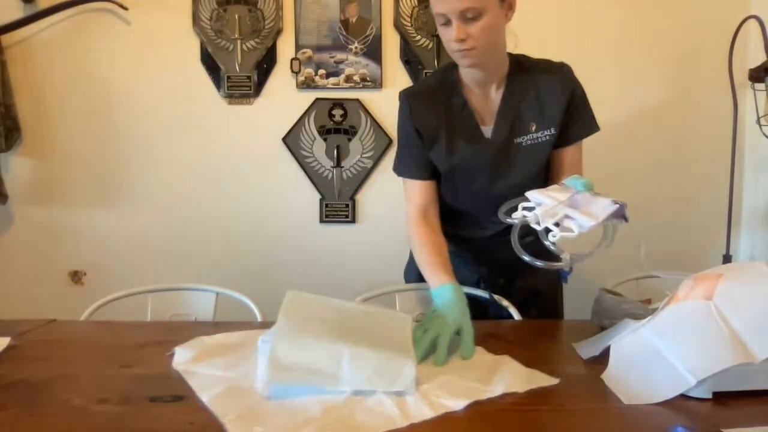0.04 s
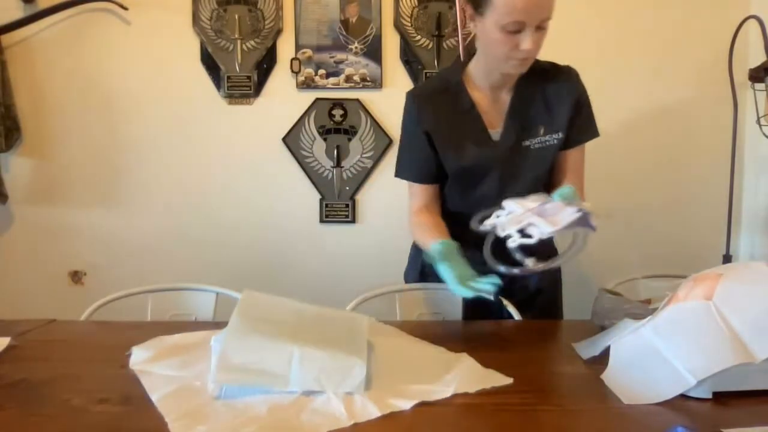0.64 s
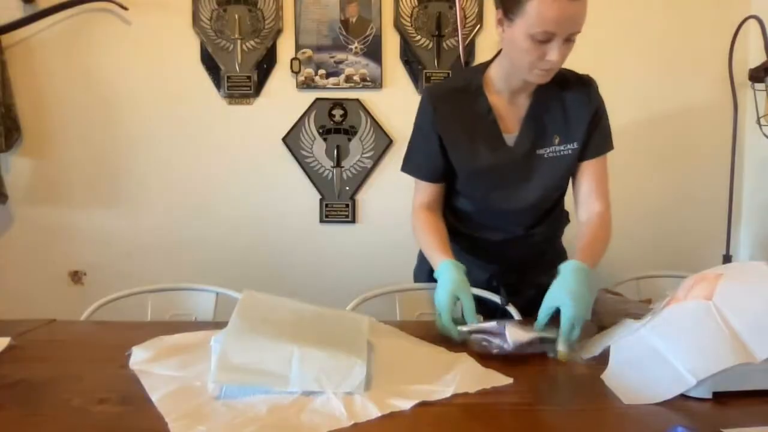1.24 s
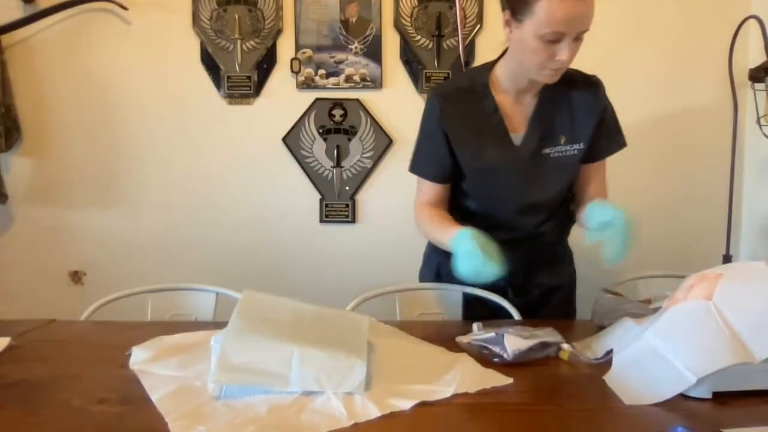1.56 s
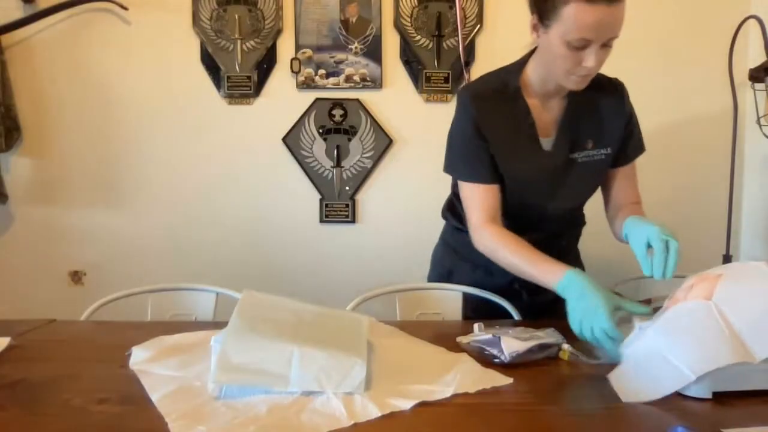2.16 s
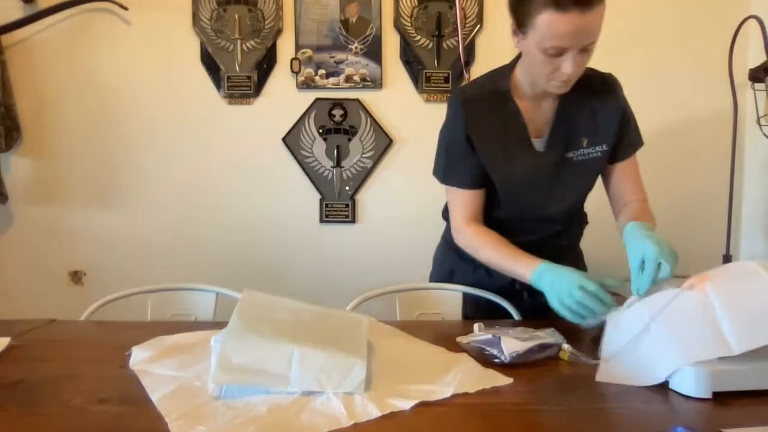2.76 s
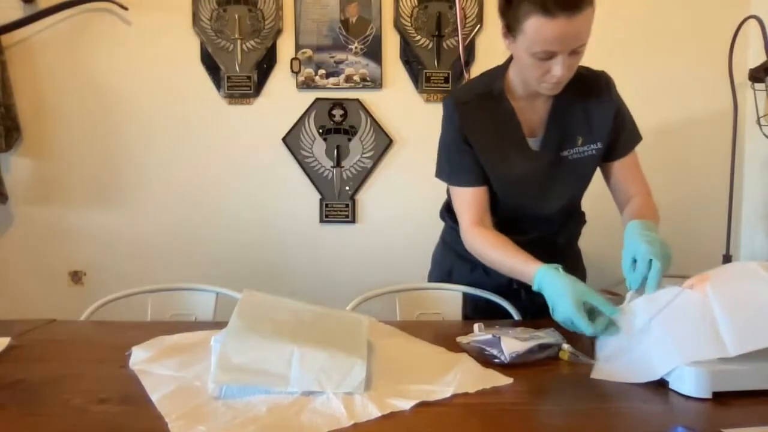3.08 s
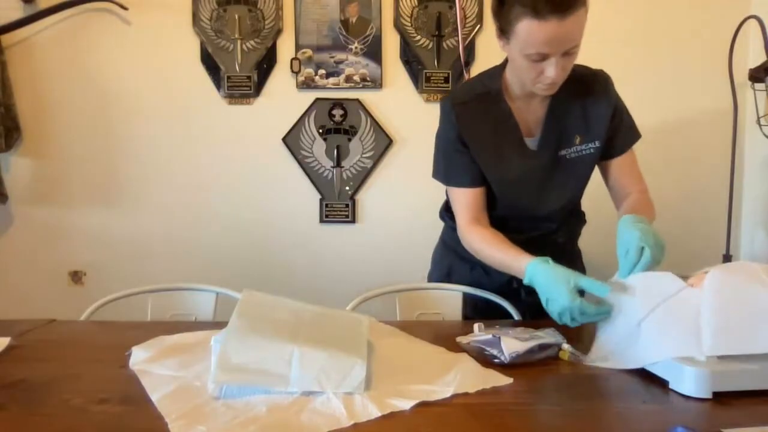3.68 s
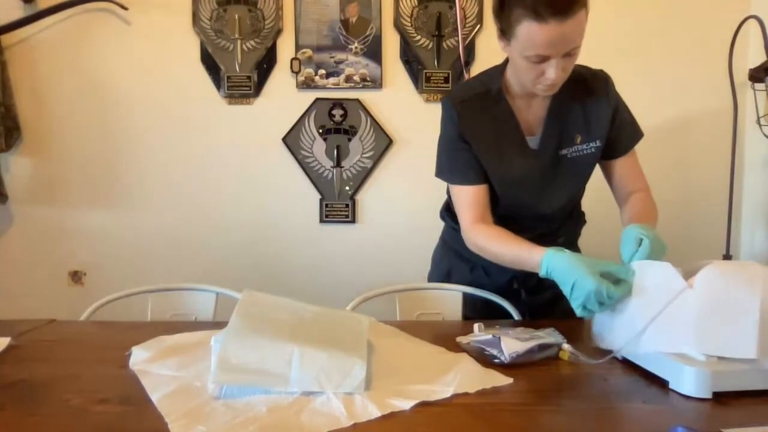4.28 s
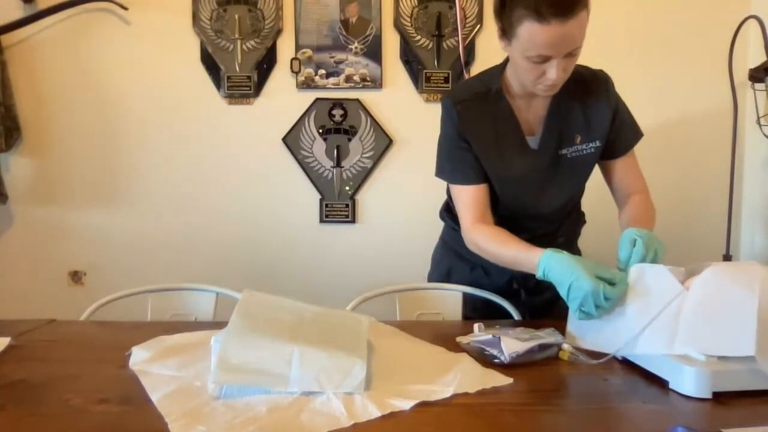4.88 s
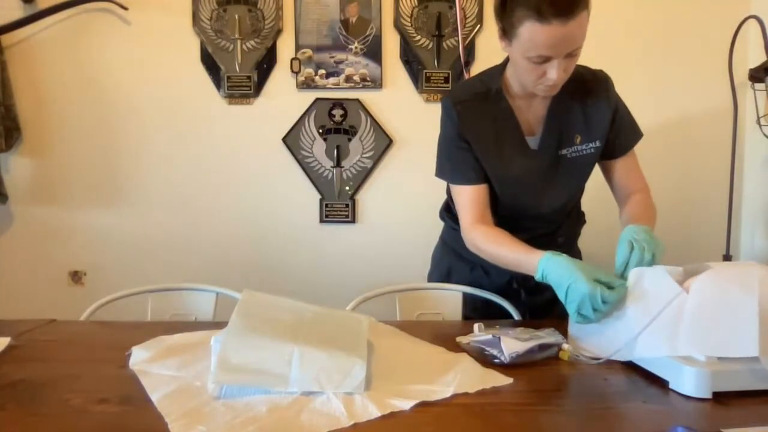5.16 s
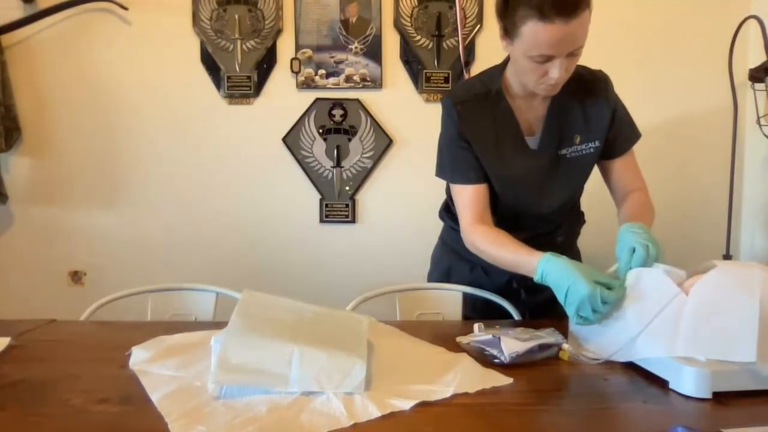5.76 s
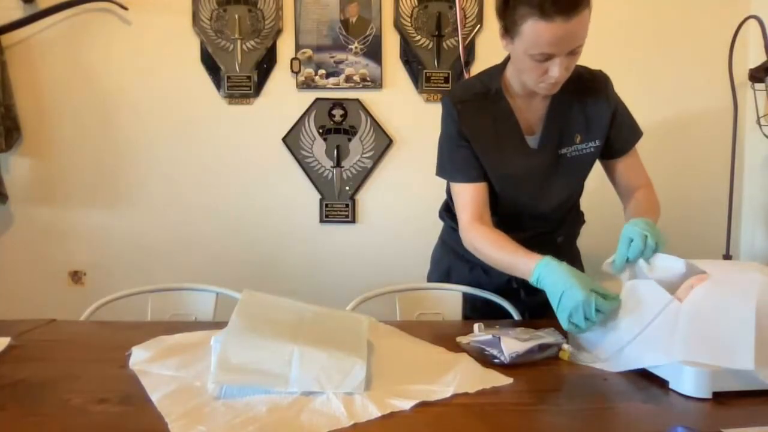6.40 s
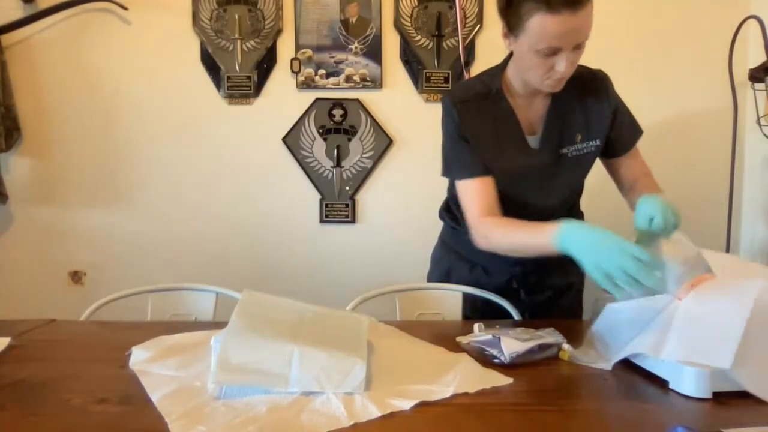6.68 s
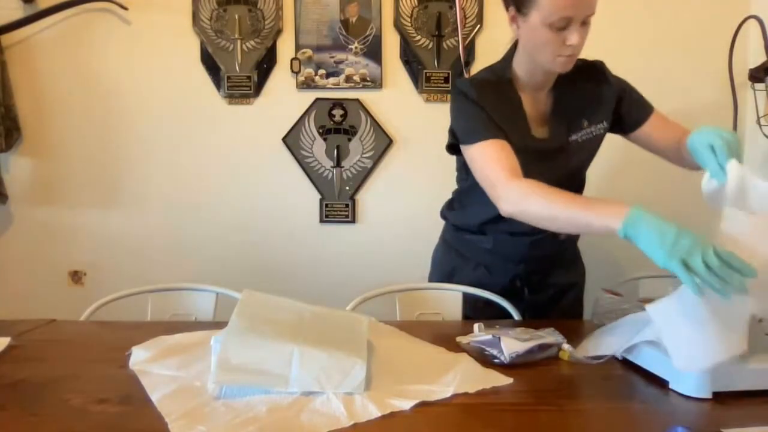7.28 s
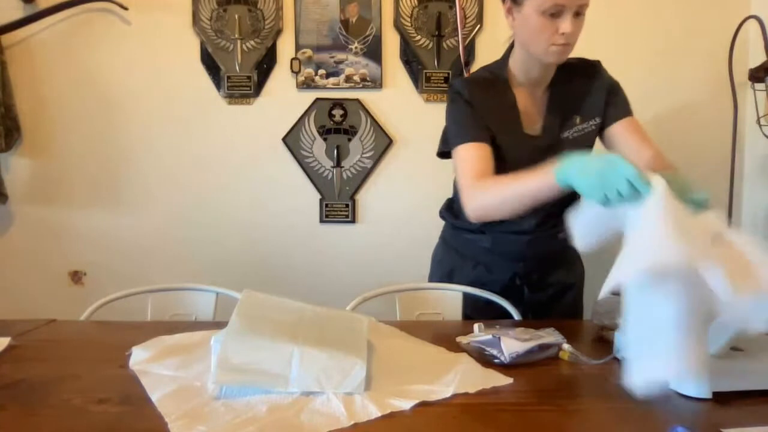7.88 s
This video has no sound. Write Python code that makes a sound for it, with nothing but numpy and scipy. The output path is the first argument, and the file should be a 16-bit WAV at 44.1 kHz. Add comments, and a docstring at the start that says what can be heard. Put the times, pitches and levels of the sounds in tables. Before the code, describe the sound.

Paper slides softly over a wooden table as a dog in another room gives one faint woof. A bagged plastic kit with tubing then clatters down, the loudest moment. After a short pause, a paper drape is tucked and pinched in uneven crinkles and small pops. The dog gives a second, gruffer woof, and the sheet flaps and rustles as it is pulled off. The room is small and very quiet.

```python
"""Wrapping paper slides softly over a wooden table, then a bagged plastic kit with tubing clatters down,
its impacts ringing the modes of kit and table top. A paper drape is tucked, pinched and pulled off a
training model: each stroke buckles tiny creases, and the sheet flaps as it lifts.
A dog in another room gives two short woofs, one at the very start and one late in the rustling.
The room is small and very quiet; a noise suppressor and a steep low-pass act on the whole sound."""
import sys
import numpy as np
from scipy import signal
from scipy.fft import rfft, irfft
from scipy.io import wavfile
from scipy.ndimage import uniform_filter1d

SR = 44100
rng = np.random.default_rng(int(sys.argv[2]) if len(sys.argv) > 2 else 0)


def persist_wave(psi):
    """Save psi, clipped to +-1, as 16-bit WAV."""
    counts = np.round(np.clip(psi, -1, 1) * 32767).astype(np.int16)
    wavfile.write(sys.argv[1], SR, np.atleast_2d(counts).T)


N = 354519
TIME = np.arange(N) / SR


def from_db(db):
    """Amplitude ratio of a level in decibels."""
    return 10 ** (np.asarray(db) / 20)


def unit_rms(x):
    """Normalisation to unit mean power."""
    return x / np.sqrt(np.mean(x ** 2) + 1e-20)


def butter(x, hz, kind, order=2):
    """Causal Butterworth low-, high- or band-pass."""
    sections = signal.butter(order, np.clip(hz, 10, .45 * SR), kind, fs=SR, output="sos")
    return signal.sosfilt(sections, x + 1e-18)


def drift(cutoff_hz):
    """Slow random fluctuation: low-passed Gaussian noise of unit rms."""
    knots = rng.standard_normal(int(N / SR * 200))
    slow = signal.sosfiltfilt(signal.butter(2, cutoff_hz, fs=200, output="sos"), knots, padtype="even")
    return np.interp(TIME, np.linspace(0, N / SR, len(slow)), unit_rms(slow))


def colour(x, spectrum):
    """Minimum-phase filtering with unit energy, built by folding the cepstrum of the given spectrum."""
    hz, db = np.transpose(spectrum)
    size = 4096
    grid_hz = np.maximum(np.fft.rfftfreq(size, 1 / SR), 1)
    magnitude = from_db(np.interp(np.log(grid_hz), np.log(hz), db))
    cepstrum = irfft(np.log(magnitude))
    cepstrum[1:size // 2] *= 2
    cepstrum[size // 2 + 1:] = 0
    response = irfft(np.exp(rfft(cepstrum)))
    return signal.fftconvolve(x, response / np.linalg.norm(response))[:len(x)]


def swell(peak_s, length_s, rise_share, roundness):
    """Envelope of a move: 1 at its peak, -40 dB at both ends; roundness 1 is pointed, 2 a bell."""
    away = np.where(TIME < peak_s, (peak_s - TIME) / rise_share, (TIME - peak_s) / (1 - rise_share))
    away /= length_s
    gain, near = np.zeros(N), away < 2
    gain[near] = from_db(-40 * away[near] ** roundness)
    return gain


def move_envelopes(moves, rise_share, roundness):
    """Incoherent summation: overlapping moves add in power, giving one envelope per level column."""
    power = 0
    for peak_s, length_s, db, *offsets_db in moves:
        gains = from_db(db + np.array([0, *offsets_db]))
        power = power + np.outer(gains, swell(peak_s, length_s, rise_share, roundness)) ** 2
    return np.sqrt(power)


def noise_decay(t60_s):
    """Dense reflections or contacts merge into exponentially decaying noise of unit energy."""
    t = TIME[:SR // 2]
    tail = rng.standard_normal(len(t)) * from_db(-60 * t / t60_s)
    return tail / np.linalg.norm(tail)


def room(x, wet_db):
    """Reverberation: diffuse reflections follow the direct sound, and the treble is absorbed first."""
    tail = butter(noise_decay(.22), 2700, "low") + butter(noise_decay(.15), 2200, "high")
    delayed_tail = np.concatenate([np.zeros(int(.004 * SR)), tail])
    return x + from_db(wet_db) * signal.fftconvolve(x, delayed_tail)[:N]


def crinkle(spectrum, per_s, spread_db, flicker_db, wet_db):
    """Buckling as a Poisson process: creases click, and the facets they ring change as the sheet bends."""
    at = np.flatnonzero(rng.random(N) < per_s / SR)
    sizes = from_db(spread_db * np.minimum(rng.exponential(1, N), 5)[at])
    edges_hz = np.geomspace(900, 8700, 35) - 830
    strengths, facets = rng.standard_normal(N), np.zeros(N)
    for k, (low, high) in enumerate(zip(edges_hz, edges_hz[1:])):
        clicks = np.zeros(N)
        clicks[at] = sizes * strengths[at - k]   # a crease strikes each facet with another strength
        flicker = from_db(flicker_db * 2 * np.tanh(drift(8) / 2))
        facets += butter(clicks, [low, high], "band") * flicker
    return room(colour(facets, spectrum), wet_db)


# Background noise of the room: (frequency [Hz], relative spectral density [dB])
AIR_SPECTRUM = [(60, -19), (130, -4), (280, -8.5), (390, 0), (520, -6.5), (1500, -15.5), (5000, -15.5),
                (7300, -27.5)]
def room_air():
    """The ambient noise floor is faint, stationary coloured noise."""
    return from_db(-84) * unit_rms(colour(rng.standard_normal(N), AIR_SPECTRUM))


# Contours of the two calls: (time [s], pitch [Hz], relative level [dB])
SOFT_CALL = [(0, 369, -53), (.02, 364, -40), (.043, 377, -48.5), (.057, 407, -41), (.071, 407.4, -28),
             (.087, 415.4, -32), (.098, 398, -47.5), (.11, 372, -32.5), (.124, 403.4, -44.5),
             (.16, 386, -49.5), (.18, 383, -58.5), (.23, 377, -72)]
GRUFF_CALL = [(6.595, 330.5, -73), (6.62, 355.5, -49.5), (6.645, 395, -42.5), (6.655, 419.4, -40),
              (6.675, 459.5, -33.5), (6.72, 462.7, -38.5), (6.738, 477, -45), (6.75, 464, -39.5),
              (6.775, 424, -65)]
# Vocal tract response for each call: (frequency [Hz], relative gain [dB])
SOFT_TRACT = [(200, -8), (390, 1), (620, -14), (830, -18), (1000, -27), (1240, -24), (1700, -37),
              (2400, -54)]
GRUFF_TRACT = [(200, -52), (270, -14), (340, 6.5), (460, 1.5), (620, 5), (750, 0), (950, -6.5),
               (1120, -2.5), (1380, 1), (1650, -11.5), (1850, -5), (2150, -17.5), (2400, -9), (2850, -22.5),
               (3150, -34.5), (4000, -45)]
def woof(call, tract, jitter, rasp, brightening, wet_db):
    """Source and filter: unsteady, raspy vocal pulses, purer when soft, are shaped by the throat."""
    times, hz, db = np.transpose(call)
    outside_s = np.abs(TIME - np.clip(TIME, times[0], times[-1]))
    level_db = np.interp(TIME, times, db) - 250 * np.minimum(outside_s, 1)   # fades beyond both ends
    effort = uniform_filter1d(from_db(level_db), size=int(.007 * SR))   # effort cannot jump
    pitch_hz = np.interp(TIME, times, hz) * (1 + jitter * drift(86.2))
    phase = 2 * np.pi * np.cumsum(pitch_hz) / SR
    overtones = sum(np.cos(k * phase) for k in range(2, 9))
    pulses = (np.cos(phase) + overtones * (effort / effort.max()) ** brightening) / 2
    breath = rasp * unit_rms(butter(rng.standard_normal(N), 2200, "low") * (1 + np.cos(phase)))
    full_voice_rms = np.std(colour((np.cos(phase) + overtones) / 2 + breath, tract))
    return room(colour(pulses + breath, tract) / full_voice_rms * effort, wet_db)


# Sliding wrapping paper: (frequency [Hz], relative spectral density [dB])
WRAP_SPECTRUM = [(530, -92.5), (900, -36), (924, -31), (1090, -16), (1230, -17.5), (1400, -9), (1970, -10),
                 (3270, -1.5), (6320, -10.5), (7340, -19), (9540, -57), (16100, -120)]
# Its moves: (peak time [s], duration [s], crinkle level [dB], hiss re crinkle [dB])
WRAP_SLIDES = [(.048, 0.21, -62.5, -2.5), (.40, 0.48, -58.5, 7), (.93, 0.26, -99, 17.5),
               (1.115, 0.099, -89, 9), (1.18, 0.16, -71.5, -17.5)]
def wrapping_paper():
    """Sliding friction: a corner of paper crosses the table, its dense clicks merging into hiss."""
    grains = crinkle(WRAP_SPECTRUM, per_s=12000, spread_db=3, flicker_db=1.5, wet_db=-10.5)
    bending, sliding = move_envelopes(WRAP_SLIDES, rise_share=.57, roundness=1.84)
    crackle = unit_rms(butter(grains, 2610, "low", order=4))
    hiss = unit_rms(butter(grains, 3300, "high", order=4))
    return crackle * bending + hiss * sliding


# Drags of gloves or plastic: (peak time [s], relative level [dB], resonance [Hz], 1/e half-length [s])
DRAGS = [(0.687, -67, 390, 0.015), (0.807, -68.5, 394, .025), (0.934, -62.5, 4600, 0.013),
         (1.394, -46.5, 405, 0.023), (2.719, -48, 1113, .012), (3.282, -47, 4020, 0.013),
         (3.468, -52, 3300, 0.049), (4.03, -61.5, 2445, 0.05), (4.149, -56.5, 2960, 0.063),
         (4.484, -40, 1537, 0.027), (5.619, -48, 1710, 0.015), (5.713, -58, 1500, 0.016),
         (5.756, -59, 5700, 0.013), (5.9, -60, 4460, 0.028), (5.98, -45, 1330, 0.011),
         (6.053, -53, 6460, 0.014), (6.416, -55, 1350, 0.016)]
def rubs():
    """Friction excites one narrow resonance of the paper or table for the length of a short drag."""
    noise, out = rng.standard_normal(N), np.zeros(N)
    for peak_s, db, hz, half_s in DRAGS:
        resonance = unit_rms(butter(noise, [hz * .905, hz * 1.095], "band"))
        out += from_db(db - 7.5) * np.exp(-((TIME - peak_s) / half_s) ** 2) * resonance
    return out


# Crinkling plastic bag: (frequency [Hz], relative spectral density [dB])
BAG_SPECTRUM = [(300, 4), (1000, -0.5), (2200, -6), (3300, -2.5), (5000, -9), (7300, -24.5)]
# Its squeezes: (peak time [s], duration [s], relative level [dB])
BAG_SQUEEZES = [(1.208, 0.26, -49.5), (1.322, 0.32, -50.5), (1.44, 0.24, -50.5), (1.482, 0.18, -42),
                (1.55, .08, -49)]
def plastic_bag():
    """Thin film buckles as the fingers squeeze the bag and it settles."""
    squeezing = move_envelopes(BAG_SQUEEZES, rise_share=.27, roundness=1)[0]
    grains = unit_rms(crinkle(BAG_SPECTRUM, per_s=2900, spread_db=3, flicker_db=2.5, wet_db=-5.5))
    return from_db(5.5) * butter(squeezing * grains, 300, "high")


def ring(modes, t):
    """Free vibration: a blow starts each mode as a damped sine of varying strength and sign."""
    out = np.zeros(len(t))
    for hz, db, t60_s in modes:
        strength = from_db(db + rng.normal(0, 2.5)) * rng.choice([-1, 1])
        decay = from_db(-60 * t / min(t60_s, .15))   # the soft bag damps the parts and the table
        out += strength * decay * np.sin(2 * np.pi * hz * t)
    return out


# Modes of kit and table top: (frequency [Hz], relative level [dB], T60 before the bag's damping [s])
PLASTIC_MODES = [(397.4, -21.5, .19), (606, -14.5, 0.46), (721, -9, .2), (908, -8.5, .2), (990, -12, 0.22),
                 (1113, -5.5, 0.17), (1144, -15.5, 0.36), (1322, -9.5, 0.1), (1523, -8, 0.1),
                 (1590, -14, 0.03), (1737, -17.5, 0.38), (2480, -21.5, 0.16), (2710, -21, .13)]
WOOD_MODES = [(107, -19, 0.36), (174, -36.5, 0.087), (237, -22, .1), (259, -15, 0.099)]
# Kit and tubing meeting the table:
# (time [s], relative level [dB], band centre [Hz], band spread re centre [ratio], thud offset [dB])
CONTACTS = [(1.2019, -17.5, 1640, 0.16, -20), (1.21, -16, 1700, 0.078, -32), (1.212, -32.5, 380, 0.68, -9),
            (1.224, -22, 910, 0.26, -26), (1.244, -26, 770, 0.17, -41), (1.273, -30, 820, 0.2, -9),
            (1.327, -31, 880, 0.23, -5), (1.332, -24, 363, 0.48, 1.5), (1.347, -31, 350, 0.45, -5),
            (1.462, -18, 2667, 0.93, 0.5), (1.4625, -19.5, 476, 0.34, -9), (1.4691, -12.5, 1730, 0.51, -5),
            (1.4705, -12, 1370, 0.12, -18), (1.473, -22.5, 297, 0.58, -0.5),
            (1.4785, -23.5, 1100, 0.98, -8.5), (1.488, -18, 1120, 0.12, -12), (1.513, -25, 600, 1, -2),
            (1.522, -24.5, 1100, 1.7, 2), (1.5399, -23, 1700, 0.43, 1), (1.552, -17, 1710, 0.2, -23),
            (1.553, -19.5, 560, 0.26, -11.5), (1.5712, -24, 800, 0.4, -14.5)]
def kit_clatter():
    """Impact excitation: each contact snaps, rattles the plastic parts and rings kit and table top."""
    blows, ringing, t = np.zeros(N), np.zeros(N), TIME[:SR // 2]
    for start_s, db, hz, spread, thud_db in CONTACTS:
        span = slice(int(start_s * SR), int(start_s * SR) + len(t))
        band = [hz / (1 + spread), hz * (1 + spread)]   # hard parts click high, the soft bag thuds low
        rattle = butter(noise_decay(.054), band, "band", order=1)
        snap = butter(noise_decay(.0032), [hz / 2, hz * 3.2], "band", order=1)
        plastic = butter(ring(PLASTIC_MODES, t), band, "band", order=1)
        wood = ring(WOOD_MODES, t)
        blows[span] += from_db(db) * rattle + from_db(db - 12) * snap
        ringing[span] += from_db(db - 10) * plastic + from_db(db + thud_db - 6.5) * wood
    return kit_radiation(blows) + ringing


# Response of the kit to a blow: (frequency [Hz], relative gain [dB])
CRACK_SPECTRUM = [(40, -52), (60, -29), (110, -7), (170, -6), (260, 3), (370, 1), (740, -1), (1150, -5.5),
                  (1700, -5.5), (2300, -9), (3500, -16), (5000, -20.5), (7300, -34)]
def kit_radiation(blows):
    """Frequency response: the kit colours the blows as it radiates them into the room."""
    return room(from_db(18) * colour(blows, CRACK_SPECTRUM), wet_db=-5.5)


# The sheet pushing air or bumping the table: (peak time [s], level [dB], frequency [Hz], duration [s])
BILLOWS = [(0.065, -52.5, 108, 0.24), (2.49, -67, 150, 0.44), (2.68, -71.5, 157, 0.16),
           (2.85, -60.5, 202, 0.22), (2.868, -57.5, 115, 0.13), (3.79, -75, 140.5, 0.32),
           (4.06, -73, 132, 0.097), (4.78, -79, 113.3, 0.38), (6.74, -63.5, 127.7, 0.35),
           (7.024, -30.5, 98, 0.039), (7.029, -39.5, 140, 0.11), (7.2, -80, 136.6, 0.19),
           (7.52, -56, 174, 0.28), (7.545, -59.5, 82.5, 0.18), (7.68, -71, 154, 0.29),
           (7.83, -71.5, 189, 0.7), (8.0, -70, 193, 0.22)]
def flaps():
    """Air displacement: the billowing sheet radiates a few slow, uneven swings of pressure."""
    out, flutter_rad = np.zeros(N), .7 * drift(35)
    for peak_s, db, hz, length_s in BILLOWS:
        envelope = from_db(db) * swell(peak_s, length_s, rise_share=.35, roundness=1.05)
        out += envelope * np.sin(2 * np.pi * hz * (TIME - peak_s) + flutter_rad)
    return room(out, wet_db=-16.5)


# Single large creases: (time [s], relative level [dB], frequency [Hz], 1/e decay time [cycles])
LARGE_CREASES = [(2.3918, -33, 2600, .7), (2.398, -34, 1720, 1.1), (2.6843, -42, 1560, 1.6),
                 (2.8283, -37, 2080, .8), (2.9854, -36, 2300, .9), (3.1967, -46, 2000, 3),
                 (3.288, -36, 3700, .9), (3.3221, -37, 2400, 1), (3.4219, -33, 2450, 1.1),
                 (3.586, -43, 2230, 1), (3.7028, -39, 1900, .7), (3.7277, -37, 2750, .6),
                 (4.0585, -47, 2450, .8), (4.204, -42, 3020, 5), (4.4365, -44, 2300, 1),
                 (4.4788, -31, 2100, .9), (4.4859, -28, 1700, 1.2), (4.6819, -41, 1900, 2),
                 (4.8906, -43, 2800, 1.8), (5.31, -35, 3700, .7), (5.3324, -31, 2170, .8),
                 (5.378, -33.5, 1700, 1.8), (5.4386, -43, 2880, .9), (5.613, -34, 1650, 1.8),
                 (5.98, -26, 1440, 1.2), (6.3686, -36, 2200, 1.5), (6.4623, -25.5, 1900, .6),
                 (6.8765, -37, 3800, .6), (7.4233, -35, 2600, 1), (7.5006, -32, 2700, .5),
                 (7.5123, -34, 1930, .7), (7.5359, -31, 1540, .6), (7.671, -32, 2740, .7),
                 (7.864, -40, 2150, 2), (7.8878, -32, 2200, .9), (7.9958, -32, 2750, .7),
                 (8.0038, -33, 2500, .7)]
def crease_pops(flurry_per_s=2200):
    """Snap-through buckling: a large crease pops amid a flurry of small ones, each ringing briefly."""
    out, t = np.zeros(N), TIME[:SR // 50]
    flurry = rng.standard_normal(N) * (rng.random(N) < flurry_per_s / SR)
    for pop_s, db, hz, cycles in LARGE_CREASES:
        clicks = from_db(-20) * flurry * swell(pop_s, length_s=.065, rise_share=.3, roundness=.94)
        clicks[int(pop_s * SR)] += 1
        snap = np.sin(2 * np.pi * hz * t) * np.exp(-t * hz / cycles)
        snap = butter(snap, 900, "high", order=5)   # too small to radiate bass
        snap = butter(snap, hz * 2.6, "low")   # soft paper radiates little far above its pitch
        out += from_db(db - 3.8) * signal.oaconvolve(clicks, snap / np.abs(snap).max())[:N]
    return room(out, wet_db=-13)


# Rustling drape: (frequency [Hz], relative spectral density [dB])
DRAPE_SPECTRUM = [(60, -44.5), (110, 1), (220, -18.5), (400, -13), (720, -11.5), (1100, -5.5), (1500, 0),
                  (2000, -1), (3000, -6.5), (4500, 0.5), (6700, -1.5), (7300, -12.5)]
# A light touch sounds a few facets, a firm stroke all: (crinkle level [dB], flicker depth [dB])
FLICKER_BY_LEVEL = [(-65, 4.6), (-47, 2.4)]
# Strokes of the hands:
# (peak time [s], duration [s], relative crinkle level [dB], hiss offset [dB], flexing offset [dB])
HAND_STROKES = [(2.35, 1, -68, -24, -16), (2.41, 0.18, -50, -23, -23.5), (2.483, 0.39, -45, -9.5, -28),
                (2.69, 0.55, -60, -15, -23), (2.828, 0.35, -54, -5, -14.5), (2.988, 0.2, -59.5, -7, -17.5),
                (3.204, 0.94, -70.5, -14, -17), (3.283, 0.32, -57.5, -2, -31),
                (3.34, 0.22, -55.5, -9.5, -44), (3.465, 0.34, -56.5, -7.5, -25),
                (3.585, 0.27, -62.5, -10, -28), (3.725, 0.19, -55, -3.5, -13),
                (3.782, 0.49, -64.5, -1.5, -21), (4.112, 0.5, -73, -3.5, -27), (4.415, 0.41, -69, -9, -21),
                (4.494, 0.23, -47, -2, -17), (4.741, 0.3, -57, -2.5, -27), (4.912, 0.28, -71, 7.5, -25.5),
                (5.071, 0.18, -73, -1.5, -43), (5.252, 0.23, -80, 6, -24), (5.331, 0.16, -50.5, 0.5, -34),
                (5.455, 0.14, -59.5, 0, -23.5), (5.569, 0.21, -50, -1.5, -29), (5.759, 0.17, -76, 5, -12.5),
                (5.895, 0.27, -66, -8.5, -18.5), (5.965, 0.14, -58, -13, -34),
                (6.057, 0.31, -85.5, 15.5, 1), (6.24, 0.32, -58, 1, -30.5), (6.388, 0.14, -46.5, -7.5, -28),
                (6.462, 0.17, -49.5, -3, -29.5), (6.86, 0.29, -60, -2.5, -24),
                (7.009, 0.16, -63.5, -1, -7.5), (7.071, 0.19, -58, -12, -25.5),
                (7.199, 0.42, -79.5, -7, -6), (7.311, 0.21, -67, -3, -17.5), (7.45, 0.33, -52, 0, -32.5),
                (7.537, 0.27, -49, -6.5, -11.5), (7.659, 0.23, -46.5, -2, -23),
                (7.816, 0.22, -70, -19, -7.5), (7.898, 0.17, -48, -1, -31.5), (8.02, 0.47, -49.5, -2, -23)]
def drape():
    """Buckling and friction: bending crackles, sliding hisses, and the whole sheet flexes in a rustle."""
    bending, sliding, flexing = move_envelopes(HAND_STROKES, rise_share=.44, roundness=1.707)
    flicker_db = np.interp(20 * np.log10(bending + 1e-9), *np.transpose(FLICKER_BY_LEVEL))
    grains = crinkle(DRAPE_SPECTRUM, per_s=6000, spread_db=3.8, flicker_db=flicker_db, wet_db=-6)
    crackle = from_db(1) * unit_rms(butter(grains, [900, 3000], "band", order=4))
    hiss = from_db(-.5) * unit_rms(butter(grains, 2600, "high", order=4))
    low_rustle = from_db(8.5) * unit_rms(butter(butter(grains, [260, 750], "band"), 740, "low"))
    return crackle * bending + hiss * sliding + low_rustle * flexing


def scene():
    """Superposition: paper, kit and dog add to the faint air of the room in one channel."""
    paper = drape() + wrapping_paper() + rubs() + crease_pops() + flaps()
    kit = kit_clatter() + plastic_bag()
    soft_woof = woof(SOFT_CALL, SOFT_TRACT, jitter=.008, rasp=.11, brightening=.15, wet_db=-5.5)
    gruff_woof = woof(GRUFF_CALL, GRUFF_TRACT, jitter=.05, rasp=.66, brightening=.14, wet_db=-2)
    dog = from_db(-4.5) * soft_woof + from_db(-2) * gruff_woof
    return (paper + kit + dog + room_air())[None]


def suppress_noise(x, memory_s=.013):
    """Spectral gating turns down bands that are faint, below their neighbours, or dying away."""
    frames = signal.stft(x, nperseg=512, noverlap=384)[2]
    power = uniform_filter1d(np.abs(frames) ** 2, size=5, axis=-1)
    narrow = np.abs(uniform_filter1d(power, size=2, axis=-2))
    wide = np.abs(uniform_filter1d(power, size=15, axis=-2))
    retention = np.exp(-128 / (SR * memory_s))   # per hop of 128 samples
    recent = signal.lfilter([1 - retention], [1, -retention], wide)
    threshold = wide * from_db(-6.5) ** 2 + recent * from_db(-43) ** 2 + from_db(-127) ** 2
    gain = narrow / (narrow + threshold)
    return from_db(4.5) * signal.istft(frames * gain, nperseg=512, noverlap=384)[1][..., :N]


def record(dry):
    """Band limiting: after noise suppression the microphone loses deep bass and the top is cut steeply."""
    without_bass = butter(suppress_noise(dry), 50, "high", order=4)
    return signal.sosfilt(signal.ellip(10, .2, 70, 7270, fs=SR, output="sos"), without_bass)


dry = scene()
out = record(dry)
persist_wave(out)
```